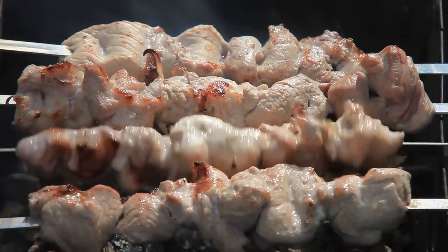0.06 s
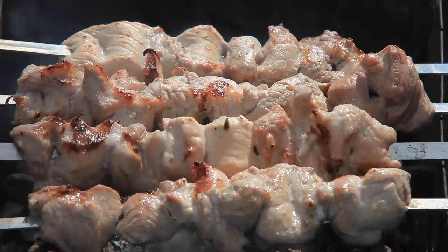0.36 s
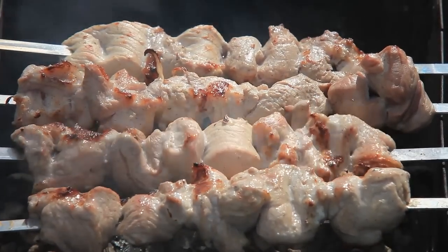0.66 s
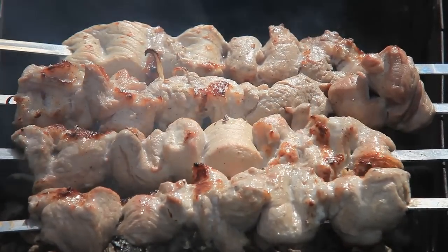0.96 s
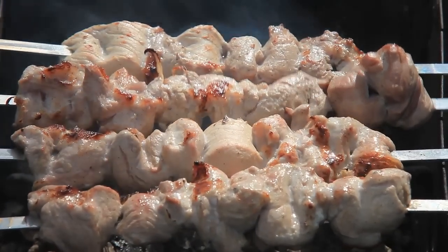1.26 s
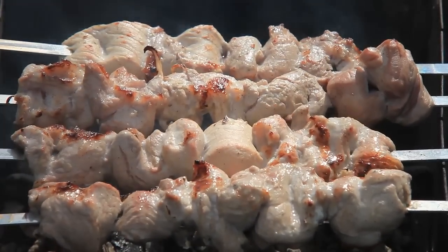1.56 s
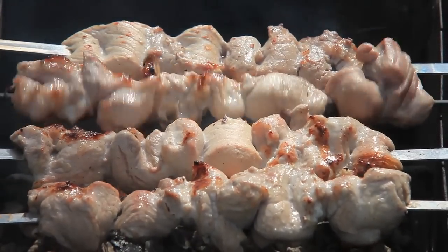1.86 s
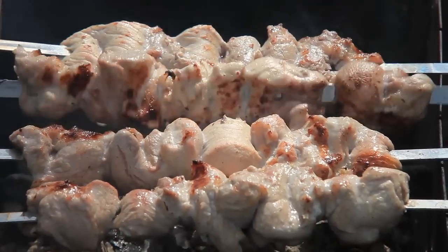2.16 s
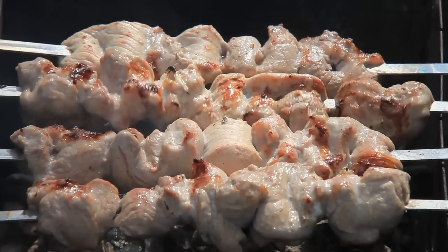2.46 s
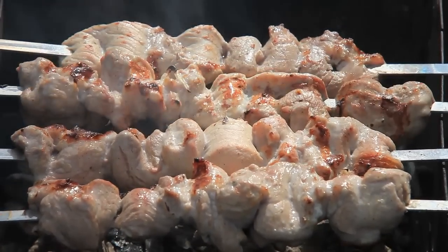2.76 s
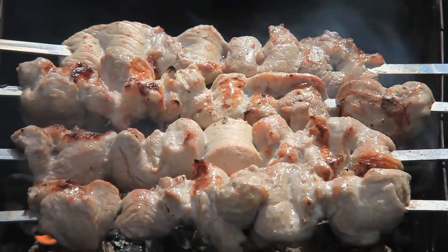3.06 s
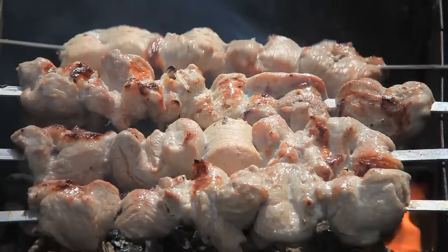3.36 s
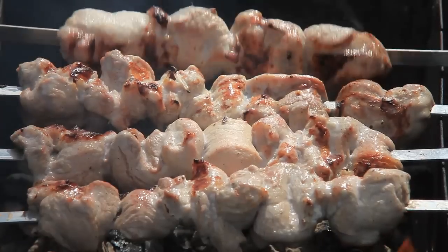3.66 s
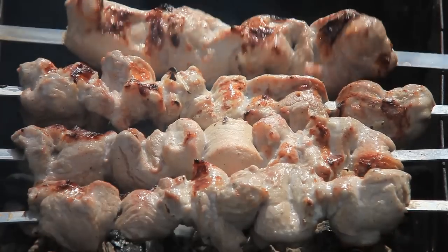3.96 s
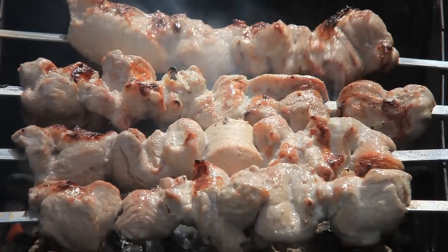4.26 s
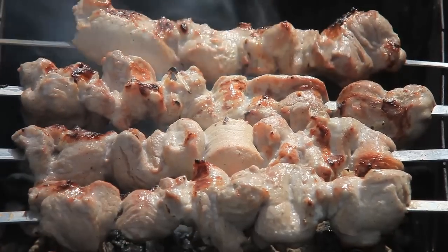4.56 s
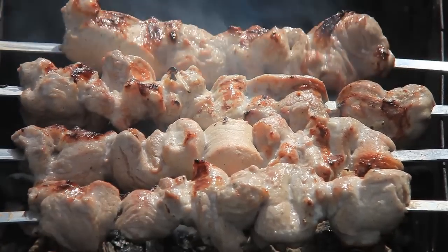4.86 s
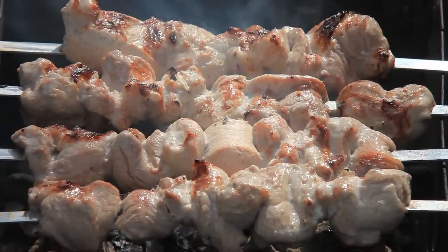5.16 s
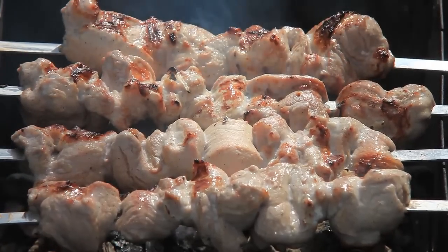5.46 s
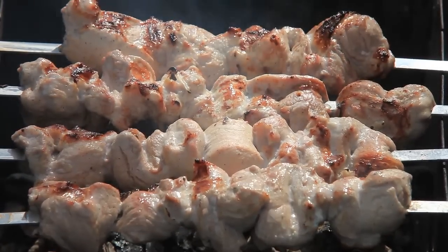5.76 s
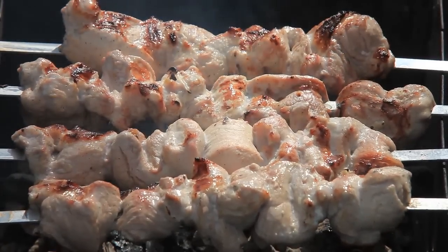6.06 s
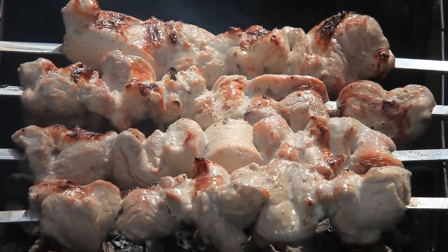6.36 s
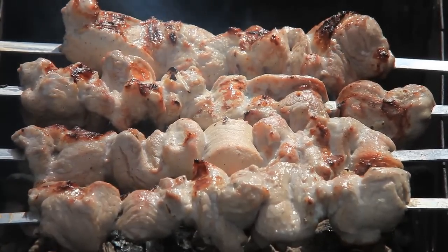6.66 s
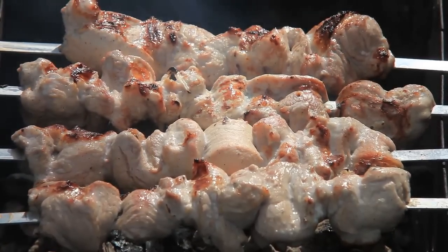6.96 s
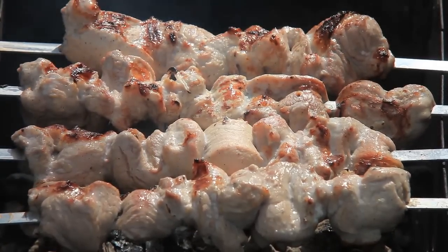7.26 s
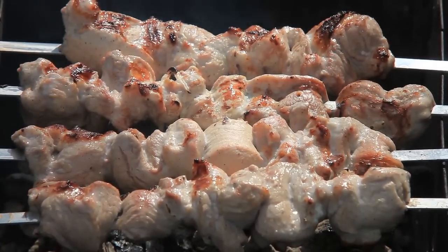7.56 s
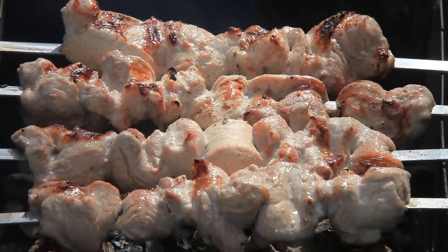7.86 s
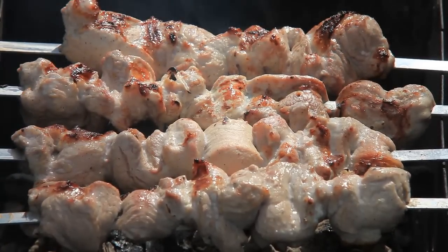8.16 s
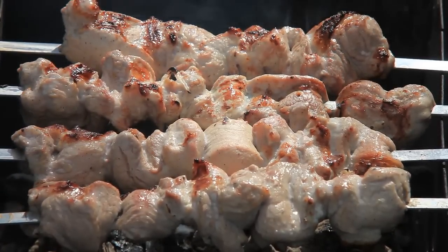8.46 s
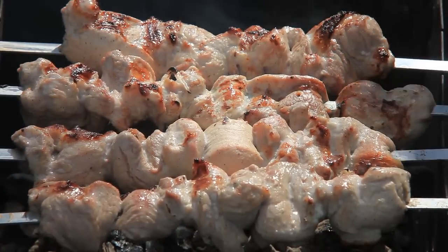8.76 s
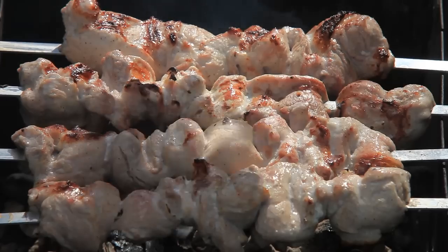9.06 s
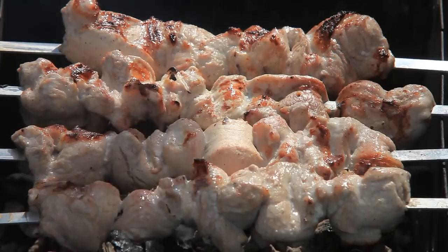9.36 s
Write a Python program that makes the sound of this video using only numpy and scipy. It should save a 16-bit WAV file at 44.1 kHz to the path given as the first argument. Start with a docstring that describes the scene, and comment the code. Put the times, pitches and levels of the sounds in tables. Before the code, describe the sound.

Close sizzling and spitting of meat skewers on an outdoor charcoal grill, with a few light knocks and faint birds behind.

```python
"""Meat skewers over glowing charcoal

Juice drips on the coals close by: it spits, then boils away in a hiss of tiny bursts.
The skewers scrape and knock as they are turned, and near the end steam gives a thin,
wandering squeal. Behind the grill are far birds, puffs of wind and a low outdoor rumble."""
import sys
import numpy as np
from scipy import signal
from scipy.fft import rfft, irfft, next_fast_len
from scipy.io import wavfile
from scipy.ndimage import map_coordinates

SR = 44100
rng = np.random.default_rng(int(sys.argv[2]) if len(sys.argv) > 2 else 0)


def digitize_waveform(pressure):
    """Quantize a signal to 16-bit integers and store it at the path in sys.argv[1].

    Rows of a 2-D input are taken as channels; values are limited to [-1, 1].
    """
    field = np.atleast_2d(pressure).T
    bounded = np.clip(field, -1, 1)
    quanta = np.round(bounded * 32767).astype(np.int16)
    wavfile.write(sys.argv[1], SR, quanta)


N = 418950
USUAL_BOIL_DB = -45  # bursts and spits grow or shrink as the boil goes above or below this

# Juice landing on the coals. Spray is the high part of its hiss, body the low part:
# (time [s], level [dB], rise [s], fade [dB/s], relative spray [dB], relative body [dB])
DRIPS = [(0.09, -35, .006, 33.5, -14, -0.5), (0.287, -34.5, 0.0055, 12, -5.5, -0.5),
         (0.54, -42, .03, 23, -11, 3), (0.72, -50, .04, 45, -24, 4), (1.783, -47.5, .005, 24, -6.5, 4.5),
         (2.05, -38.5, 0.026, 67, -11, -4.5), (2.24, -43, 0.036, 33, -24.5, 4.5),
         (2.42, -35, 0.073, 67, -21, -1.5), (3.12, -44, 0.075, 130, -28, 4),
         (3.3, -49.5, 0.044, 1.5, -24.5, 5), (3.56, -44.5, 0.2, 10, -21, 3),
         (3.903, -36.5, 0.023, 19, -9, -4), (4.33, -43, 0.034, 140.5, -20, -3),
         (4.5, -43.5, .03, 71.5, -13, -7), (4.78, -49.5, 0.041, 42, -18, -6),
         (5.34, -46, 0.027, 48, -16, -6), (6.329, -45, 0.039, 75, -15, 1), (6.89, -49, 0.076, 6, -9, 1),
         (7.66, -47, .01, 150, -14, 0), (7.73, -47, .01, 45, -13, -2), (7.93, -53.5, 0.049, 12.5, -5, 1),
         (8.88, -56.5, 0.028, 12, -18, -2)]
# The simmer between drips: (time [s], level [dB], relative body [dB])
SIMMER = [(0, -47, 1.5), (1.6, -52.5, 6.5), (3, -50.5, -0.5), (5.1, -54.5, -14), (5.9, -58, -14),
          (6.7, -61.5, -4), (8.4, -56, -12), (9.5, -55, -3)]
def boiling():
    """Drips add to the simmer. Gives the boil's level, and its spray and body relative to it, in dB."""
    simmer_db, simmer_body_db = curves(SIMMER)
    simmer_spray_db = -11.5
    power = amp([simmer_db, simmer_db + simmer_spray_db, simmer_db + simmer_body_db]) ** 2
    for s, db, rise, fade, spray_db, body_db in DRIPS:
        shares = [1, amp(spray_db) ** 2, amp(body_db) ** 2]
        power = power + np.outer(shares, swell(s, db, rise, fade))
    boil, spray, body = power
    return 10 * np.log10([boil, spray / boil, body / boil])


# Tone colour of frying, or how strong it is from low to high: (frequency [Hz], level [dB])
FRYING_COLOUR = [(600, -36), (1500, -21.5), (2300, -14), (2700, -6), (3500, -8), (4100, -0.5), (4700, 1),
                 (5500, -1), (6500, -3), (8500, -8.5), (10000, -22), (12000, -16), (16000, -29.5)]
# Tone colour of the fine spray: (frequency [Hz], level [dB])
SPRAY_COLOUR = [(4000, -35), (6500, 7.5), (8300, 6), (10000, -7.5), (12300, 0), (13600, -16), (15800, -6)]
def sizzle(boil_db, spray_db, body_db):
    """Boiling juice hisses and crackles; the harder it boils, the louder and denser the sound."""
    rate = 1650 * amp(0.45 * (boil_db - USUAL_BOIL_DB))  # bursts a second
    sputter = amp(boil_db + 1.27 * wobble(35) + 0.68 * wobble(150))
    frying = amp(-3) * noise(FRYING_COLOUR)
    frying += amp(-1.4) * bursts(FRYING_COLOUR, rate, spread_db=4.5, pitch_spread=0.067)
    # The body is the hiss below 3900 Hz; a hot spot gives less of it.
    body = filtered(frying, lambda hz: 1 / (1 + (hz / 3900) ** 20))
    spray = amp(-2.5) * noise(SPRAY_COLOUR)
    spray += amp(-0.5) * bursts(SPRAY_COLOUR, rate, spread_db=7, pitch_spread=0.015)
    return sputter * (frying - body + amp(body_db) * body + amp(spray_db) * spray)


# Loud spits of fat and cracks of coal: (time [s], peak [dB], brightness [Hz], relative rattle [dB])
LOUD_POPS = [(0.0914, -8.5, 4930, -5.5), (0.222, -9.5, 5260, -17.5), (0.2322, -14, 5200, -11),
             (0.2403, -15, 5200, 0.5), (0.2905, -16, 5900, 2), (0.4896, -15, 5200, -5),
             (0.5631, -13, 5300, -1), (0.7292, -15.5, 4550, -5), (1.7856, -18, 4740, -2),
             (2.158, -15, 4700, -4), (2.4731, -16.5, 5240, -6.5), (2.5093, -12, 5300, 0),
             (2.5255, -13.5, 5700, -5), (2.6098, -16, 4870, -13), (3.351, -20.5, 4960, -4),
             (3.7471, -18.5, 5400, -11), (3.8655, -17.5, 4670, -7), (3.9364, -16, 5570, 5.5),
             (4.3275, -17, 5560, -17), (4.3814, -14, 5000, -1.5), (4.5762, -16, 4870, -16.5),
             (4.6065, -13, 6000, -13), (4.855, -21.5, 6100, -8), (4.9189, -22, 4840, -3),
             (5.2059, -19.5, 5100, -6.5), (5.4305, -22, 4670, -6.5), (5.9478, -19.5, 5600, -8),
             (6.0018, -26.5, 5570, 2), (6.0533, -23, 4660, 2), (6.2198, -27, 5700, -4),
             (6.3533, -9.5, 4800, -14.5), (6.3879, -22, 4230, 2), (6.3958, -13.5, 4500, -1.5),
             (6.5282, -0.5, 4070, -6.5), (6.542, -9.5, 4800, -6), (6.9147, -19, 5000, 1),
             (6.9502, -19.5, 5100, -4), (6.993, -20, 5700, -1.5), (7.1954, -20, 4570, -3),
             (7.2016, -21, 4930, -1), (7.3051, -20.5, 5000, -3), (7.7473, -21, 5200, -7),
             (7.7529, -10.5, 4570, -4.5), (7.832, -20, 6000, -9.5), (8.684, -24, 7000, 2),
             (8.7845, -21.5, 3950, -14), (8.9603, -21, 6000, -3.5), (9.0828, -22.5, 6100, 12),
             (9.087, -15.5, 6000, -7)]
# Tone colour of a pop's click: (frequency [Hz], level [dB])
CLICK_COLOUR = [(60, -30), (300, -18.5), (1000, -10), (1400, -14), (1800, -4.5), (2300, -6), (3000, -2),
                (4800, 5.5), (6500, 1), (8300, -4.5), (10000, -17), (12300, -18), (16000, -30)]
def pops(rows):
    """Each pop is one sharp click; those deep in the coals are duller and rattle briefly."""
    out = np.zeros(N)
    for s, db, bright_hz, rattle_db in rows:
        brightness = bright_hz / 4900
        tilt_db = 8 * np.log2(brightness)  # per octave: a bigger hollow gives a darker click
        colour = [(hz, level + tilt_db * np.log2(max(hz, 900) / bright_hz))
                  for hz, level in CLICK_COLOUR]
        rattle = signal.fftconvolve(echoes(0.0086, 0.5 + rattle_db, 0.02), echoes(0.063, -11, 0.08))
        pop = signal.fftconvolve(click(colour, brightness ** 0.5), rattle)
        add(out, s, amp(db) * pop / np.abs(pop).max())
    return out


def spits(boil_db, tries=500):
    """Small pops come at random moments, more often and louder where the boil is hard."""
    moment, chance = rng.random((tries, 2)).T
    scatter = np.clip(rng.standard_normal((tries, 3)), -2, 2)
    at = (moment * N).astype(int)
    extra_boil_db = boil_db[at] - USUAL_BOIL_DB
    peak_db = -26 + 0.69 * extra_boil_db + 2.5 * scatter[:, 0]
    bright_hz = 5600 * np.exp(0.096 * scatter[:, 1])
    rattle_db = -8.5 + 4 * scatter[:, 2]
    per_second = 9 * amp(0.7 * extra_boil_db)
    rows = np.column_stack([at / SR, peak_db, bright_hz, rattle_db])
    return pops(rows[chance * tries < per_second * N / SR])


# Short hisses around one pitch, from spurts of steam and brief skewer scrapes:
# (time [s], length [s], pitch [Hz], width [Hz], level [dB])
SHORT_HISSES = [(0.089, 0.11, 4870, 1500, -36), (0.288, 0.13, 8500, 1800, -41),
                (0.741, 0.15, 4530, 1190, -41), (2.048, 0.062, 5800, 2410, -42.5),
                (2.149, 0.031, 2600, 900, -41.5), (2.425, 0.0063, 4700, 700, -27),
                (2.45, 0.12, 4930, 895, -32), (2.472, 0.077, 6660, 1300, -34),
                (3.16, 0.12, 3430, 1600, -47), (3.168, 0.092, 1980, 500, -49),
                (3.909, 0.17, 1950, 600, -52), (3.906, 0.12, 4590, 900, -38.5),
                (3.907, 0.14, 7350, 1900, -38), (4.333, 0.078, 4530, 800, -39),
                (8.898, 0.012, 2710, 1200, -41)]
def short_hisses():
    """A spurt of steam or a brief scrape starts quickly, hisses around one pitch and dies away."""
    out, t = np.zeros(N), np.arange(SR // 4) / SR
    for s, length, hz, width_hz, db in SHORT_HISSES:
        loudness = (1 - np.exp(-t / 0.0029)) * np.clip(1 - (t / length) ** 3, 0, 1)
        add(out, s, amp(db) * loudness * band(hz, width_hz, size=len(t)))
    return out * amp(3.5 * wobble(200))


# Skewers sliding and embers shifting: (time [s], level [dB], rise [s], fade [dB/s])
SCRAPES = [(0.09, -47.5, 0.052, 30), (1.83, -54, 0.026, 70), (2.28, -56.5, .03, 86),
           (2.42, -54, 0.068, 46.5), (3.12, -52.5, 0.12, 110), (3.3, -54.5, .04, 82.5),
           (3.89, -51.5, .03, 45), (4.33, -54, 0.028, 83), (4.52, -56.5, 0.019, 46),
           (6.35, -55.5, .04, 100), (7.27, -58, .02, 24), (7.73, -53, 0.021, 74),
           (7.92, -53.5, 0.024, 11.5), (8.78, -55, 0.02, 34), (9.03, -45.5, 0.058, 103)]
# Tone colour of the rustling coals: (frequency [Hz], level [dB])
EMBER_COLOUR = [(90, -12), (200, -2.5), (450, 3), (600, 2), (800, 2), (1050, 0.5), (1400, -2), (1900, 1),
                (2300, -3.5), (3100, -2), (4500, -2), (8000, -11.5), (15000, -20.5)]
def embers(boil_db):
    """The coals give a dull, gritty rustle, stirred by the steam and the turning skewers."""
    resting, steam = amp(-59.5), amp(boil_db - 21)
    power = resting ** 2 + steam ** 2 + sum(swell(*scrape) for scrape in SCRAPES)
    grit = bursts(EMBER_COLOUR, rate=500, spread_db=4, pitch_spread=0.12)
    return np.sqrt(power) * amp(wobble(25)) * (amp(1) * noise(EMBER_COLOUR) + amp(-3) * grit)


# Skewers hitting the grill: (time [s], peak [dB], brightness [Hz], pitch [ratio])
KNOCKS = [(1.868, -38, 900, 1.46), (2.309, -39, 800, 1.24), (3.221, -39, 250, 1.2),
          (3.36, -38.5, 900, 1.46), (3.906, -39, 1200, 1.6), (4.343, -36.5, 1110, 1.95),
          (7.283, -39.5, 400, 1.32), (7.328, -36, 1100, 1.86), (8.07, -45, 160, 1.15),
          (8.774, -27.5, 2500, 1.16), (8.7841, -27.5, 344, 0.98), (9.107, -29, 2200, 1.16),
          (9.4743, -25, 1160, 0.97)]
# The tones the grill rings with: (pitch [Hz], level [dB], time to fade by 60 dB [s])
GRILL_TONES = [(138, -8.5, 0.087), (400, 4.5, 0.043), (488, -5.5, 0.04), (804, 5, 0.015),
               (1000, 4.5, 0.028), (1205, 3, 0.031), (1620, -21, .02)]
def knocks():
    """A skewer lands on the rim. The spot sets the pitch; a softer touch leaves only the low tones."""
    out, t = np.zeros(N), np.arange(SR // 6) / SR
    for s, db, bright_hz, pitch in KNOCKS:
        ring = sum(amp(level + rng.normal(0, 3.9) - 60 * t / fade_s) * np.cos(2 * np.pi * hz * pitch * t)
                   for hz, level, fade_s in GRILL_TONES)
        knock = signal.lfilter(*signal.butter(2, bright_hz, fs=SR), ring)
        add(out, s, amp(db) * knock / np.abs(knock).max())
    return out


# The path of the steam's whistle: (time [s], pitch [Hz], level [dB])
SQUEAL = [(8.72, 8900, -63), (8.76, 9700, -53), (8.8, 9900, -52), (8.81, 9000, -57), (8.86, 9900, -53),
          (8.915, 11800, -61), (8.975, 9850, -58), (9.04, 11150, -66), (9.09, 9800, -68)]
def squeal():
    """Steam escapes through a pinhole in the meat and whistles at an unsteady pitch."""
    hz, db = curves(SQUEAL)
    t = np.arange(N) / SR
    sounding = (t > SQUEAL[0][0]) & (t < SQUEAL[-1][0])
    return sounding * amp(db) * tone(hz * (1 + 0.0077 * wobble(700)))


# Notes of far birds:
# (time [s], length [s], held pitch [Hz], slide [share of pitch], flutter [share of pitch], level [dB])
BIRD_NOTES = [(2.69, 0.039, 5800, 0.23, .025, -39.5), (2.797, 0.16, 4600, -0.25, 0.042, -43.5),
              (3.01, 0.041, 5780, 0.19, .03, -44.5), (3.356, .06, 5600, 0.11, .035, -44),
              (3.425, 0.16, 3780, 0.16, 0.025, -48.5), (5.335, 0.085, 4400, -0.14, 0.0075, -42.5),
              (5.53, 0.08, 4390, -0.18, .008, -45), (6.094, 0.072, 3450, -.15, 0.02, -57),
              (6.567, .3, 3100, 0.028, 0.069, -63), (6.926, .13, 4260, -.15, 0.016, -39.5),
              (7.137, 0.13, 4420, -0.22, 0.0069, -44), (9.126, 0.13, 4290, -0.18, 0.0073, -51),
              (9.311, .11, 4450, -0.087, 0.0045, -45.5)]
def birds():
    """Each note slides onto its pitch and flutters there; echoes from the surroundings blur it."""
    out, t = np.zeros(N), np.arange(SR // 2) / SR
    for s, length, hz, slide, flutter, db in BIRD_NOTES:
        progress = np.minimum(t / length, 1)
        pitch = hz * (1 + slide * np.exp(-8 * progress) + flutter * wobble(700, size=len(t)))
        note = tone(pitch) * np.abs(np.sin(np.pi * progress ** 1.1)) ** 0.32
        tremble = amp(2 * wobble(132, size=len(t)))
        add(out, s, amp(db - 2.5) * signal.fftconvolve(note * tremble, echoes(0.59, -1.8, 0.5)))
    return out


# Stretches of twittering: (start [s], end [s], middle pitch [Hz], level [dB])
TWITTER = [(2.65, 3.7, 4870, -49.5), (5.948, 6.9, 3605, -61)]
def twitter():
    """Small birds farther off scatter short chirps up and down, half lost in their echo."""
    out, progress = np.zeros(N), np.linspace(0, 1, SR // 25)
    for start, end, hz, db in TWITTER:
        for s in np.arange(start, end, 0.06):
            delay, height, glide = rng.uniform(-1, 1, 3)
            pitch = hz * np.exp(0.22 * height + 0.153 * glide * progress)
            add(out, s + 0.028 * delay, amp(db) * np.sin(np.pi * progress) * tone(pitch))
    return signal.oaconvolve(out, echoes(0.33, 1, 0.5))[:N]


# How loud the outdoor rumble is: (time [s], level [dB])
RUMBLE_LEVELS = [(0, -59.5), (1.5, -56), (2.6, -59), (4.2, -60.5), (7, -64.5), (9.5, -65.5)]
# Tone colour of the rumble: (frequency [Hz], level [dB])
RUMBLE_COLOUR = [(15, -15), (30, -8), (55, -0.5), (95, 0), (150, -3), (220, -7.5), (400, -18.5),
                 (1000, -45)]
# Puffs of wind: (time of the peak [s], level [dB])
WIND_PUFFS = [(.62, -57), (1.53, -54), (2.44, -53), (2.91, -50), (3.36, -55), (7.13, -51.5)]
def outdoors():
    """A low rumble with a fuzzy, far drone in it, and soft puffs of wind."""
    rumble_db, = curves(RUMBLE_LEVELS)
    t = np.arange(N) / SR
    drone = amp(-4) * band(hz=131.3, width_hz=17)
    rumble = amp(2 * wobble(7)) * noise(RUMBLE_COLOUR)
    puffs = sum(amp(db) * np.exp(-((t - s) / 0.053) ** 2) for s, db in WIND_PUFFS)
    return amp(rumble_db) * (rumble + drone) + puffs * band(hz=62, width_hz=53)


def amp(db):
    """Turn decibels into a number to multiply a sound by."""
    return 10 ** (np.asarray(db) / 20)


def unit(x):
    """Scale a sound to an average strength (rms) of 1."""
    return x / np.sqrt(np.mean(x ** 2) + 1e-20)


def level_at(colour, hz):
    """Look up a tone colour's level in dB at any frequency."""
    frequencies, levels = np.transpose(colour)
    return np.interp(np.log(hz + 1), np.log(frequencies), levels)


def curves(rows):
    """Join a table's rows with straight lines: one curve for each column after the time."""
    s, *columns = np.transpose(rows)
    return [np.interp(np.arange(N) / SR, s, column) for column in columns]


def swell(s, db, rise, fade_db_per_s):
    """The power of a sound that rises to its level, then fades steadily."""
    age = np.maximum(np.arange(N) / SR - s, 0)
    return np.minimum(age / rise, 1) * amp(db - fade_db_per_s * np.maximum(age - rise, 0)) ** 2


def wobble(rate, size=N):
    """A smooth curve through `rate` random values a second."""
    values = rng.standard_normal(int(size * rate / SR) + 4)
    return map_coordinates(values, [np.arange(size) * rate / SR])


def add(track, s, sound):
    """Mix a sound into the track, starting at s seconds."""
    part = track[max(round(s * SR), 0):][:len(sound)]
    part += sound[:len(part)]


def filtered(x, gain):
    """Turn each frequency of a sound up or down by gain(hz)."""
    size = next_fast_len(N + SR // 2)
    return irfft(rfft(x, size) * gain(np.fft.rfftfreq(size, 1 / SR)), size)[:N]


def tone(hz):
    """A pure tone that follows a changing pitch."""
    return np.sin(2 * np.pi * np.cumsum(hz) / SR)


def noise(colour):
    """Steady noise with the given tone colour."""
    return unit(filtered(rng.standard_normal(N), lambda hz: amp(level_at(colour, hz))))


def band(hz, width_hz, size=N):
    """Steady noise around one pitch."""
    detune = 2 * (np.fft.rfftfreq(size, 1 / SR) - hz) / width_hz
    return unit(irfft(rfft(rng.standard_normal(size)) / np.sqrt(1 + detune ** 4), size))


def click(colour, shift=1, size=512):
    """The sharpest click with this tone colour, its pitch multiplied by `shift`."""
    log_gain = level_at(colour, np.fft.rfftfreq(size, 1 / SR) / shift) * np.log(10) / 20
    one_sided = 2 * irfft(log_gain)[:size // 2]  # packs the energy at the start of the click
    return irfft(np.exp(rfft(one_sided, size)))


def echoes(fade_s, echo_db, length_s):
    """The direct sound, then a wash of echoes that drops 60 dB in fade_s."""
    t = np.arange(int(length_s * SR)) / SR
    tail = rng.standard_normal(len(t)) * amp(-60 * t / fade_s) * (1 - np.exp(-t / 0.00034))
    return (t == 0) + amp(echo_db) * tail / np.linalg.norm(tail)


def bursts(colour, rate, spread_db, pitch_spread, spot_count=6):
    """A crackle of tiny bursts, mostly weak, from spots that each have their own pitch and echo."""
    out = np.zeros(N)
    sizes = amp(spread_db * np.minimum(rng.exponential(size=N), 4)) * rng.choice([-1, 1], N)
    hits = sizes * (rng.random(N) < rate / SR)
    spots = rng.integers(spot_count, size=N)
    for spot, place in enumerate(np.linspace(-1, 1, spot_count)):
        shift = np.exp(pitch_spread * place)
        burst = signal.fftconvolve(click(colour, shift), echoes(0.0094, -1.6, 0.02))
        out += signal.oaconvolve(hits * (spots == spot), burst / np.linalg.norm(burst))[:N]
    return unit(out / np.sqrt(rate))


def scene():
    """The grill in front and the outdoors behind, in one channel."""
    boil_db, spray_db, body_db = boiling()
    behind = birds() + twitter() + outdoors()
    grill = sizzle(boil_db, spray_db, body_db) + short_hisses() + embers(boil_db) + knocks() + squeal()
    popping = pops(LOUD_POPS) + spits(boil_db)
    return (grill + popping + behind)[None]


def record(dry):
    """Cut away the very highest treble."""
    return filtered(dry[0], lambda hz: hz < 15900)[None]


dry = scene()
out = record(dry)
digitize_waveform(out)
```